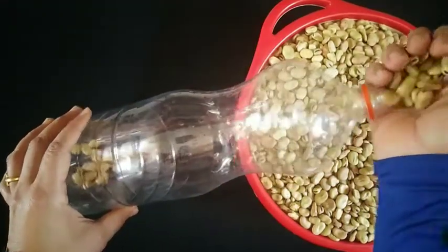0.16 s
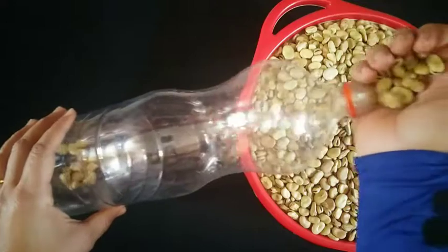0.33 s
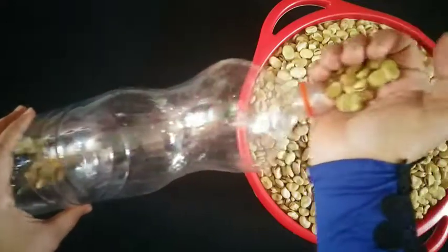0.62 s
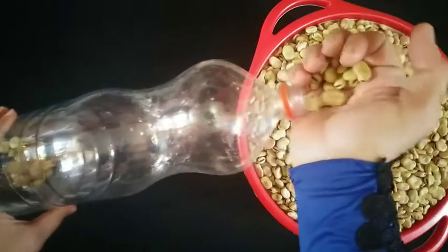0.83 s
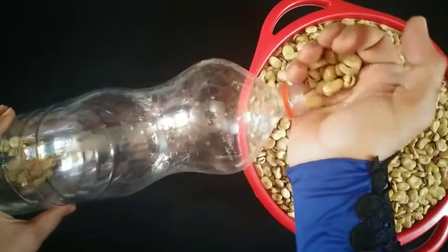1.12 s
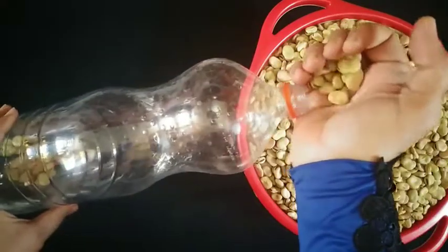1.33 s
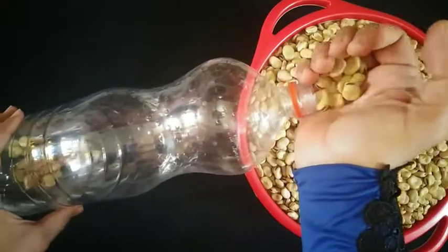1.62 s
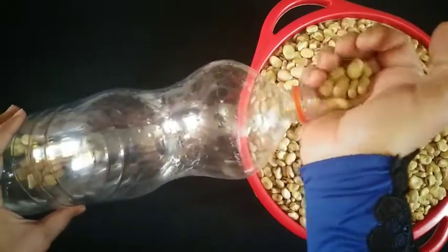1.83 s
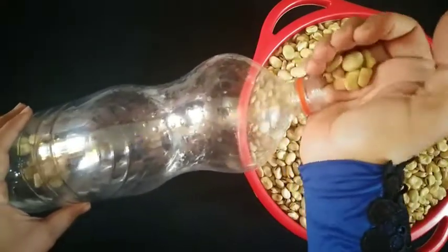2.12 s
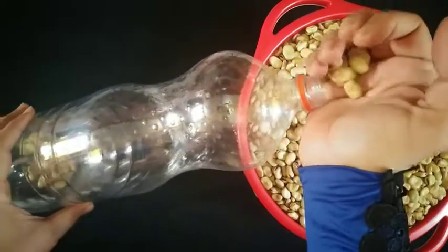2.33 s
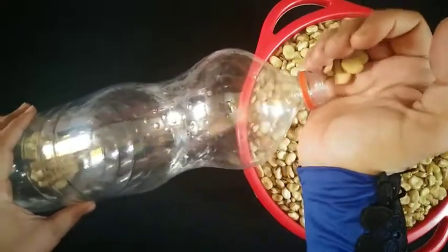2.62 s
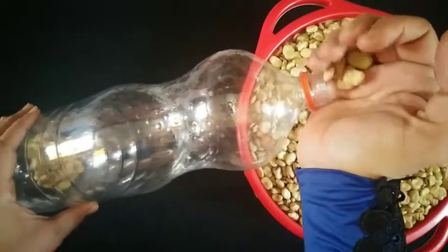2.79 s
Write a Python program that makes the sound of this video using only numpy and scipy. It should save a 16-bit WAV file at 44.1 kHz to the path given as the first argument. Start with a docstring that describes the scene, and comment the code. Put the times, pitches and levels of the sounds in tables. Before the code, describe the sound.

Beans rattling into a thin hollow plastic bottle: light ticks first, a quick busy burst, scattered single knocks, then a steadier clatter towards the end, heard very close and nearly dry, with faint handling hush.

```python
"""A faint hush and light rattling come first, then dried beans slide from a palm into an empty plastic
bottle, close to a phone's two microphones. Every bean knocks the thin wall, sets its brighter modes
ringing and ticks with a burst of hiss. Random smaller contacts rattle after each knock and between
knocks. The hush and rumble of the hands grow with the rattling, and a small quiet room answers."""
import sys
import numpy as np
from scipy import signal
from scipy.fft import rfft, irfft, next_fast_len
from scipy.io import wavfile

SR = 44100
rng = np.random.default_rng(int(sys.argv[2]) if len(sys.argv) > 2 else 0)


def dump(signal):
    """Clip the signal to [-1, 1] and save it as 16-bit WAV at the path in sys.argv[1]."""
    limited = np.clip(np.atleast_2d(signal).T, -1, 1)
    pcm = np.round(limited * 32767).astype(np.int16)
    wavfile.write(sys.argv[1], SR, pcm)


N = 130095  # samples in the scene


def amp(db):
    """Turn dB into gain."""
    return 10 ** (np.asarray(db) / 20)


def filtered(x, response):
    """Multiply the spectrum of x by a response that depends on frequency in Hz."""
    m = next_fast_len(N + SR // 4)  # room at the end, so the end does not wrap onto the start
    spectrum = rfft(x, m) * response(np.fft.rfftfreq(m, 1 / SR))
    return irfft(spectrum, m)[..., :N]


def hiss(colour):
    """Make unrelated noise for each side, coloured by (Hz, dB) points and scaled to rms 1."""
    f, db = np.transpose(colour)
    x = rng.standard_normal((2, N))
    x = filtered(x, lambda hz: amp(np.interp(np.log(hz + 1), np.log(f + 1), db)))
    return x / x.std()


ROOM_ALIKE_HZ = 900  # here half the power is shared by both sides


def diffuse(pair, shared):
    """Mix sound from all around: alike at both microphones in the bass, unrelated higher up."""
    def alike(hz):
        return 1 / (1 + (hz / ROOM_ALIKE_HZ) ** 2)
    apart = filtered(pair, lambda hz: np.sqrt(1 - alike(hz)))
    together = filtered(shared, lambda hz: np.sqrt(alike(hz)))
    return apart + together


AIR_DB = -65.5  # level while the rattling is at its average in dB
AIR_FOLLOWS = 0.63  # dB gained per dB of rattling
# Colour of the hush and rumble of the hands at work.
# Each row: frequency in Hz, relative level in dB per Hz.
HANDS_COLOUR = [(30, -1), (100, 17), (190, 17), (450, 15.5), (2000, 4), (16000, -36)]


def hands_rumble():
    """Hands at work give a low, coloured noise that swells as the beans get busier."""
    busy_db = np.interp(np.arange(N) / SR, *np.transpose(LOOSE_RATTLE))
    level = amp(AIR_DB + AIR_FOLLOWS * (busy_db - busy_db.mean()))
    return level * diffuse(hiss(HANDS_COLOUR), hiss(HANDS_COLOUR)[0])


SMALL_PER_S = 700  # light contacts per second
SETTLE_T60, SETTLE_DB = .1, -16.5  # fall by 60 dB in seconds; start relative to the knock in dB
SMALL_SCATTER_DB, COLOUR_SCATTER_DB = 4.5, 2.5  # spread of levels; further spread of their parts
SMALL_KNOCK_DB, SMALL_TICK_DB = 3, -3  # in the loose rattling, relative to the ring
# How strongly the beans rattle loosely, apart from the big knocks.
# Each row: time in seconds, base level of the rattling in dB.
LOOSE_RATTLE = [(0, -58), (.06, -62), (.2, -60), (.42, -48.5), (.66, -42.5), (.78, -49.5), (.9, -58.5),
                (.99, -75.5), (1.19, -46.5), (1.26, -59.5), (1.53, -51.5), (1.64, -57), (1.76, -55.5),
                (1.84, -60.5), (1.89, -67.5), (2.15, -50.5), (2.34, -48.5), (2.58, -53), (2.74, -50.5),
                (2.9, -59), (2.95, -54)]


def small_beans():
    """Beans touch lightly at random: settling after each knock, on top of the loose rattling."""
    slot_s = np.arange(0, N / SR, 1 / SMALL_PER_S)
    draw = rng.random((len(slot_s), 2))
    colour = rng.standard_normal((len(slot_s), 4))
    s = slot_s + draw[:, 0] / SMALL_PER_S
    big = np.array(BEAN_HITS)
    since = s[:, None] - big[:, 0]
    fade = amp(SETTLE_DB - 60 * np.abs(since) / SETTLE_T60) ** 2
    settling = np.where(since > 0, fade, 0) @ amp(big[:, 1:4]) ** 2
    loose_db = np.interp(s, *np.transpose(LOOSE_RATTLE))
    loose = amp(loose_db)[:, None] ** 2 * amp([SMALL_KNOCK_DB, 0, SMALL_TICK_DB]) ** 2
    # most contacts stay weak, a few are much stronger
    db = 10 * np.log10(settling + loose) - SMALL_SCATTER_DB * np.log(draw[:, 1:] + .05)
    parts_db = db + COLOUR_SCATTER_DB * colour[:, :3]
    pitch = 2100 * 2 ** (0.33 * colour[:, 3])  # Hz, spread by a third of an octave
    return np.column_stack([s, parts_db, pitch])


def train(s, size):
    """Place impulses of the given sizes at the given times."""
    at = np.clip(np.round(s * SR).astype(int), 0, N - 1)
    return np.bincount(at, size.real, N) + 1j * np.bincount(at, size.imag, N)


def fading(pulses, t60, attack_s, hz=0):
    """Make every impulse rise quickly and die away, swinging at hz."""
    slow = np.exp((2j * np.pi * hz - np.log(1000) / t60) / SR)
    fast = slow * np.exp(-1 / attack_s / SR)
    return signal.lfilter([0, slow - fast], np.poly([slow, fast]), pulses)


ATTACK_S = 0.0008
APART_HZ, LAG_S = 2600, .00007  # typical phase gap is one radian at APART_HZ; left hears first


def modes(s, db, table, favour_db, detune, scatter_db):
    """Each contact rings every mode anew, at random a little flat, true or sharp, with its own phases."""
    out = np.zeros((2, N))
    for hz, level_db, t60 in table:
        draw = rng.standard_normal((len(s), 4))
        level = amp(db + level_db + favour_db(hz) + scatter_db * draw[:, 0])
        size = level * np.exp(.5j * draw[:, 1])
        # half the phase gap between the two microphones
        turn = np.exp(.5j * (draw[:, 2] * hz / APART_HZ + 2 * np.pi * hz * LAG_S))
        bend = np.clip(np.round(draw[:, 3]), -1, 1)
        for step in np.unique(bend):
            mine = size * (bend == step)
            pair = np.array([train(s, mine * turn), train(s, mine / turn)])
            out += fading(pair, t60, ATTACK_S, hz * (1 + detune * step)).imag
    return out


KNOCK_DETUNE, KNOCK_SCATTER_DB = 0.008, 3  # detune is a fraction of the pitch
LEFT_BASS_DB = 3.5  # how much louder the knocks are on the left
# Low modes of the bottle wall and the air inside it.
# Each row: frequency in Hz, relative level in dB, time to fall by 60 dB in seconds.
KNOCK_MODES = [(261.7, -26, 0.05), (384.7, -20, 0.052), (545, 2, 0.007), (459, -16.5, 0.04),
               (690, -19.5, 0.082), (935, 3, 0.0057), (1241, -5.5, 0.011)]


def knocks(s, db):
    """A bean's blow moves the bottle wall and its air in their low modes."""
    both = modes(s, db, KNOCK_MODES, lambda hz: 0, KNOCK_DETUNE, KNOCK_SCATTER_DB)
    return both * amp([[LEFT_BASS_DB / 2], [-LEFT_BASS_DB / 2]])


DETUNE, RING_SCATTER_DB = 0.019, 2  # detune is a fraction of the pitch
RING_SPREAD_OCT, RING_REST_DB = 0.24, -12.5  # octaves to a 6 dB drop; the largest drop
# Upper, brighter modes of the bottle wall.
# Each row: frequency in Hz, relative level in dB, time to fall by 60 dB in seconds.
RING_MODES = [(1860, 4.5, 0.017), (2100, 5.5, 0.0093), (2367, -5.5, 0.029), (2700, -3, 0.017),
              (2902, 1.5, 0.019), (3400, -8.5, 0.021), (3980, 10, 0.0068)]


def rings(s, db, pitch):
    """Each contact rings the upper wall modes, favouring those near its own pitch."""
    def near(hz):
        octaves = np.log2(hz / pitch)
        return np.maximum(-6 * (octaves / RING_SPREAD_OCT) ** 2, RING_REST_DB)
    return modes(s, db, RING_MODES, near, DETUNE, RING_SCATTER_DB)


TICK_ATTACK_S, TICK_T60 = 0.0012, 0.015  # rise and 60 dB fall in seconds
TICK_BANDS_HZ = np.geomspace(2000, SR / 2, 9)  # edges of eight bands
TICK_SCATTER_DB = 4
# Average colour of the tick.
# Each row: frequency in Hz, relative level in dB per Hz.
TICK_COLOUR = [(2060, 1), (3500, -4), (5820, -5), (8740, 1), (11100, -13), (13100, -17), (14900, -28),
               (16000, -81)]


def ticks(s, db):
    """Each contact lets out a short burst of hiss, its level scattered anew in every band."""
    noise = hiss(TICK_COLOUR)
    out = np.zeros((2, N))
    for lo, hi in zip(TICK_BANDS_HZ, TICK_BANDS_HZ[1:]):
        level = amp(db + TICK_SCATTER_DB * rng.standard_normal(len(s)))
        gate = fading(train(s, level).real, TICK_T60, TICK_ATTACK_S).real
        out += gate * filtered(noise, lambda hz: (hz >= lo) & (hz < hi))
    return out


BASS_CUT_HZ = 171
# The beans that strike the bottle clearly; the levels are set before each mode's own level and scatter.
# Each row: start in seconds, knock level in dB, ring level in dB, tick level in dB,
# pitch where the ring is strongest in Hz.
BEAN_HITS = [(0.0672, -35.5, -25.5, -52, 2600), (0.096, -35.5, -27, -40, 2350),
             (0.1156, -39, -28, -40, 2500), (0.152, -34, -27, -47, 2730), (0.1593, -31, -26.5, -40, 2410),
             (0.184, -24.5, -31, -31.5, 2440), (0.2371, -32.5, -31.5, -27.5, 2750),
             (0.2738, -24.5, -29, -23, 1990), (0.3042, -26, -26.5, -42, 2300),
             (0.3164, -40, -33, -33, 2280), (0.3618, -23, -26.5, -29, 2480),
             (0.3868, -22.5, -54, -32.5, 2090), (0.408, -26, -21, -36, 2420),
             (0.429, -17.5, -19.5, -21.5, 1740), (0.438, -57, -35, -26, 1890),
             (0.4937, -25.5, -39, -27, 2200), (0.5287, -22.5, -50, -43, 2100),
             (0.5464, -19, -28, -27.5, 1870), (0.591, -37, -28, -47, 1860), (0.639, -25, -31, -34, 2280),
             (0.6576, -32, -27, -28, 2240), (0.7088, -42, -29, -35, 2620), (0.747, -25.5, -22.5, -30, 1830),
             (0.8005, -28, -30, -31, 1880), (0.8323, -25.5, -34, -27, 1990), (0.8563, -47, -26, -67, 2340),
             (0.8665, -28, -24.5, -33, 2460), (0.9336, -30, -27, -33.5, 2600),
             (0.9565, -32, -38.5, -34, 2100), (0.997, -23, -30.5, -31, 2170),
             (1.0332, -27.5, -60, -31.5, 1920), (1.041, -23.5, -25, -28, 1830),
             (1.059, -30.5, -25.5, -36, 2180), (1.0811, -28, -17.5, -28.5, 2390),
             (1.1258, -29, -28.5, -21.5, 2370), (1.2079, -20, -29.5, -32.5, 2070),
             (1.2175, -36, -31, -31, 2220), (1.2326, -28, -34, -32.5, 2230),
             (1.2815, -31.5, -32, -35.5, 1840), (1.295, -27.5, -31.5, -29, 2230),
             (1.3185, -42, -20.5, -44, 2480), (1.352, -29.5, -95, -30.5, 1920),
             (1.4003, -28.5, -33, -30.5, 2420), (1.422, -22.5, -27.5, -24, 1870),
             (1.4428, -22.5, -26.5, -31, 2150), (1.4862, -31, -55, -30.5, 2180),
             (1.4944, -24.5, -17, -32, 1900), (1.5105, -25, -36, -30, 2000),
             (1.5716, -30.5, -34, -32, 2100), (1.5793, -34, -24, -28.5, 3170),
             (1.66, -28.5, -33.5, -31.5, 2250), (1.7765, -36.5, -23, -26.5, 2340),
             (1.7985, -61, -26.5, -37, 2660), (1.8124, -39, -31, -31, 2620),
             (1.8205, -45, -28, -32.5, 2700), (1.8372, -52, -35, -33, 2860),
             (1.9061, -23, -33.5, -28.5, 1890), (1.9191, -42, -29, -73, 2300),
             (1.9335, -31.5, -35, -29, 2160), (1.9433, -22.5, -26, -34, 1840),
             (2.0188, -34.5, -28.5, -49, 2100), (2.0419, -25.5, -27, -23, 2400),
             (2.067, -22, -29.5, -28.5, 2120), (2.1078, -23.5, -44, -33, 1940),
             (2.1218, -26.5, -31, -25.5, 1910), (2.168, -22.5, -16.5, -24, 1900),
             (2.205, -27, -22.5, -20, 1810), (2.2698, -26.5, -37, -28.5, 2420),
             (2.3022, -24, -35, -27, 2370), (2.315, -53, -22, -30, 2210), (2.327, -59, -23, -25.5, 2620),
             (2.343, -25.5, -37, -26, 1900), (2.3793, -35, -24, -20.5, 1860),
             (2.4013, -58, -18.5, -24.5, 1800), (2.4154, -32, -25, -26.5, 1840),
             (2.4318, -22, -19, -27.5, 2220), (2.4866, -43, -37, -66, 2340),
             (2.4983, -35, -20.5, -37, 3020), (2.5301, -20.5, -29, -26, 1910),
             (2.6037, -26, -36.5, -24.5, 1870), (2.6325, -33.5, -29.5, -27, 2110),
             (2.676, -20, -26, -22.5, 2040), (2.7239, -24.5, -27.5, -20.5, 2100),
             (2.7646, -30, -54, -24, 2600), (2.8089, -24, -25.5, -24, 1870),
             (2.9136, -53, -28.5, -55, 2800)]


def bottle():
    """Every contact, big or small, knocks, rings and ticks; a small bottle sends out little bass."""
    contacts = np.vstack([BEAN_HITS, small_beans()])
    s, knock_db, ring_db, tick_db, pitch = np.transpose(contacts)
    beans = knocks(s, knock_db) + rings(s, ring_db, pitch) + ticks(s, tick_db)
    return filtered(beans, lambda hz: (1j * hz / (BASS_CUT_HZ + 1j * hz)) ** 3)


ROOM_T60, ROOM_DB = .12, -14  # 60 dB fall in seconds; level of the answer


def room(x):
    """The room returns a short tail of fading noise; both microphones share its bass."""
    t = np.arange(SR // 4) / SR
    fade = amp(-60 * t / ROOM_T60) * (t > .005)  # the answer starts after 5 ms
    tail = rng.standard_normal((3, len(t))) * fade
    tail = tail / np.linalg.norm(tail[0])
    wet = signal.fftconvolve(x[[0, 1, 0]], tail, axes=1)[:, :N]
    return amp(ROOM_DB) * diffuse(wet[:2], wet[2])


def scene():
    """Add the hands' rumble, the beans in the bottle and the room's answer."""
    beans = bottle()
    return hands_rumble() + beans + room(beans)


TOP_HZ = 16500


def record(dry):
    """Keep nothing at or above the band limit."""
    return filtered(dry, lambda hz: hz < TOP_HZ)


dry = scene()
out = record(dry)
dump(out)
```